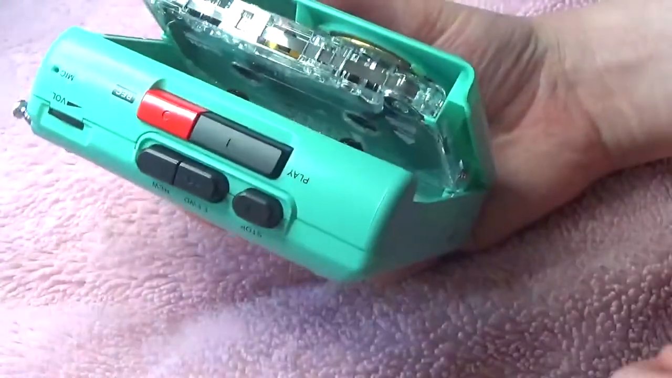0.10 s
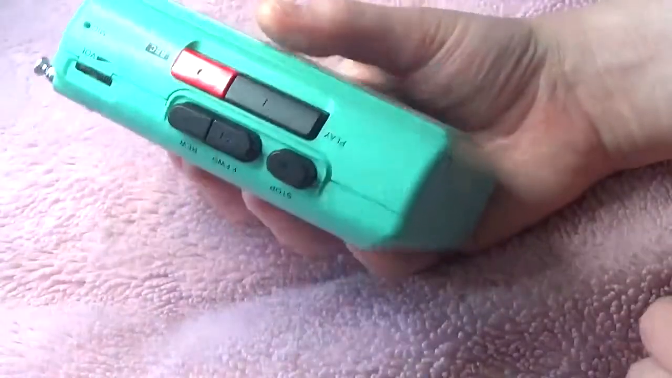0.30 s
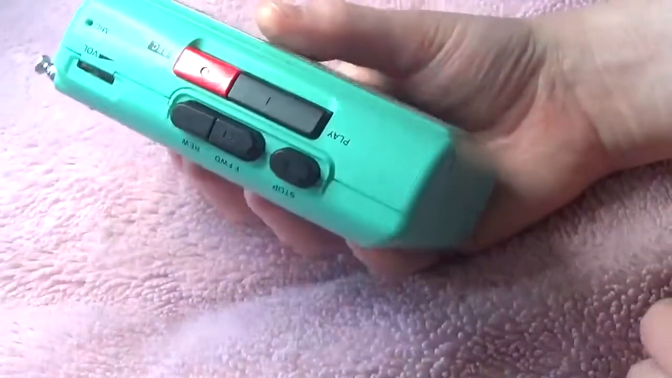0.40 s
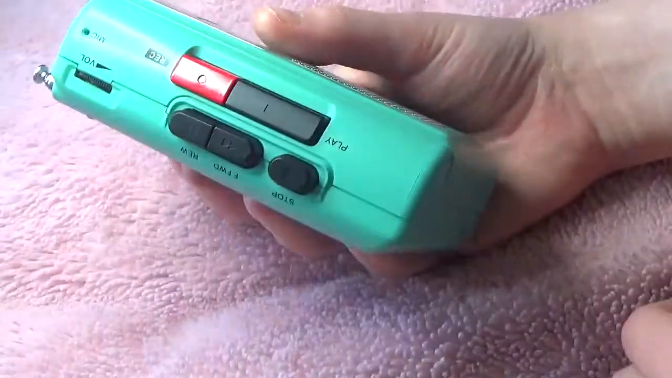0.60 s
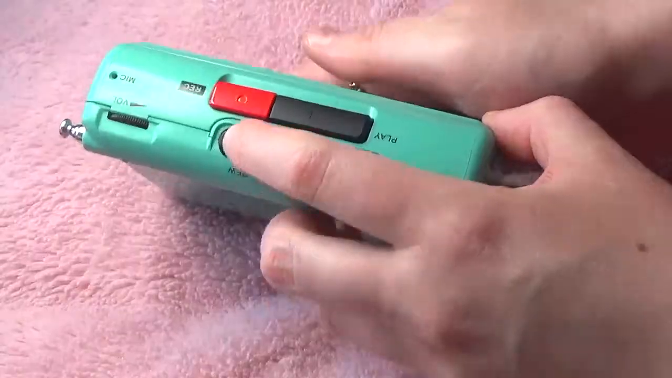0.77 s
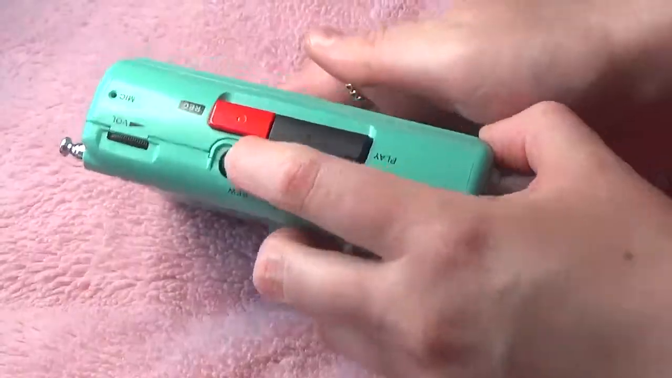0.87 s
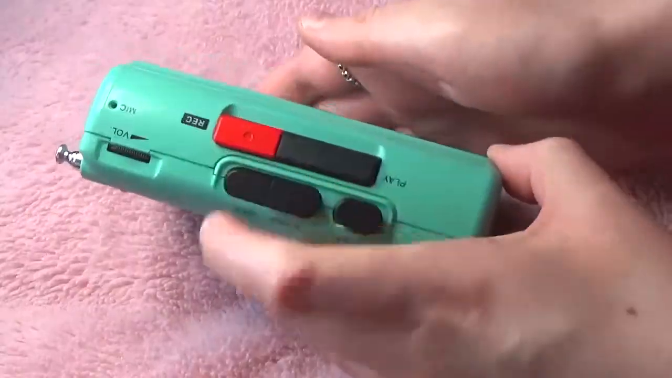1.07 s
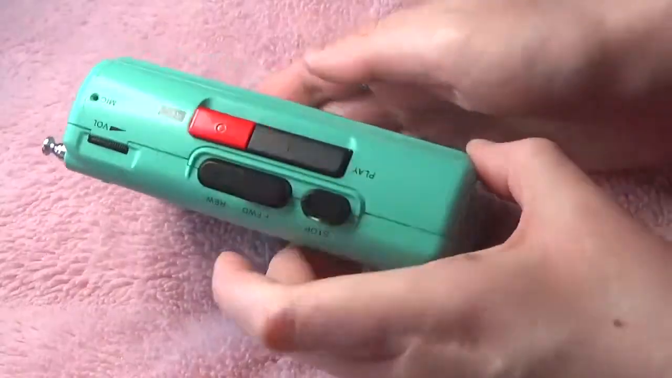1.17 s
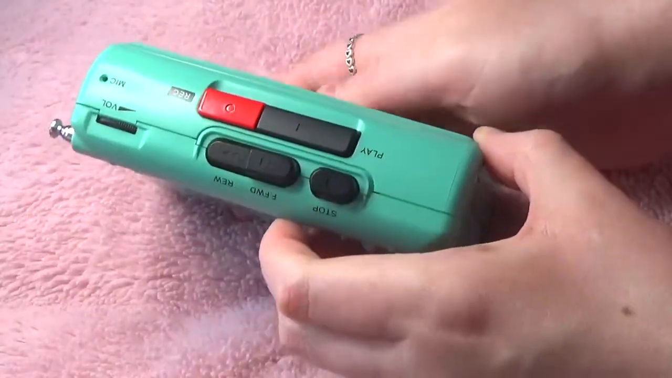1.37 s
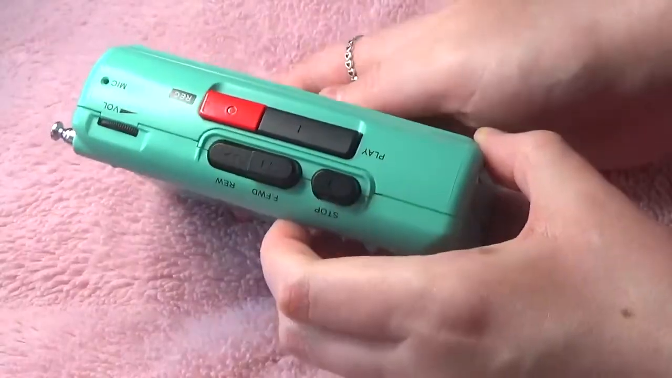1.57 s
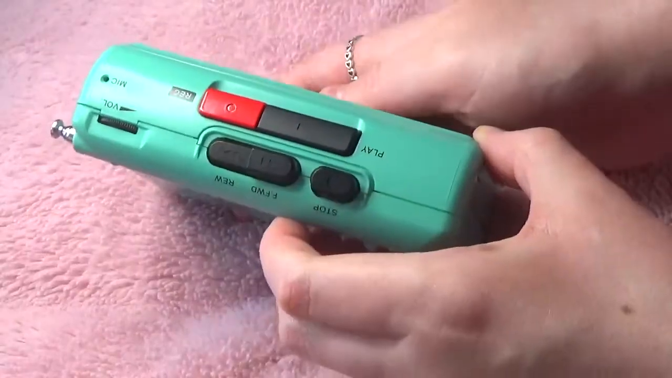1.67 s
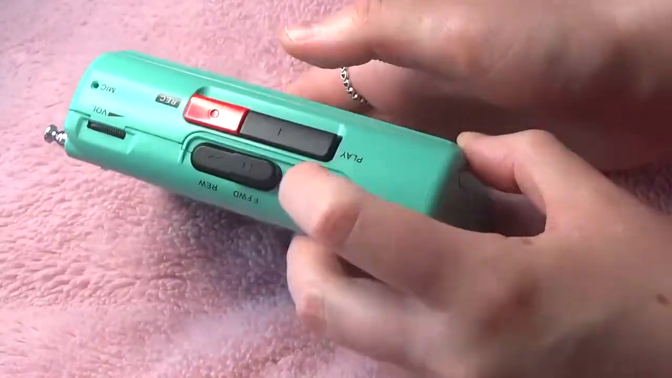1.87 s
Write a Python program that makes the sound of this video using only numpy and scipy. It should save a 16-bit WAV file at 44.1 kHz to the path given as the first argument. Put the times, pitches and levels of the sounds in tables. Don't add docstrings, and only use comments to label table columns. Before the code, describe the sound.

A small plastic cassette player door clatters shut, then keys click and a tape motor whirrs faintly

```python
import sys
import numpy as np
from scipy import signal
from scipy.fft import rfft, irfft, next_fast_len
from scipy.io import wavfile
from scipy.ndimage import map_coordinates

SR = 44100
rng = np.random.default_rng(int(sys.argv[2]) if len(sys.argv) > 2 else 0)


def voltage_ratio(level):
    return 10 ** (np.asarray(level, float) / 20)


def unload_wav(signal):
    wavfile.write(
        sys.argv[1],
        SR,
        np.round(np.clip(np.atleast_2d(signal).T, -1, 1) * 32767).astype(np.int16),
    )


N = 83790


def door():
    # (time [s], crack [dB], boom re crack [dB], panel ring re crack [dB], t60 [s])
    door_hits = [(.1620, -61, 7, 10, 0.012), (.1910, -47.5, -7, -1, 0.0055), (.2245, -37.5, 4, 7.5, 0.016),
                 (.2305, -30, 6, -8, 0.014), (.2397, -32.5, -5, -1.5, 0.0088),
                 (.2425, -18, -20, -5.5, 0.028), (.2485, -13, 0, -12, 0.012), (.2520, -12, -8, -7, 0.012),
                 (.2560, -10, -3.5, -12, 0.016), (.2615, -18.5, -0.5, 0.5, 0.0068),
                 (.2630, -25.5, 14, 10, 0.01), (.2710, -26.5, -32, -4, 0.032), (.2785, -31, 9, 6.5, 0.0083),
                 (.2828, -15, -14.5, -1.5, 0.024), (.2862, -9, -15, -14.5, 0.014),
                 (.2935, -20.5, -0.5, -19, 0.023)]
    # (frequency [Hz], level [dB])
    door_body = [
        [(672, 320, -18), (914, 180, -4), (1083, 130, -1.5), (1590, 200, -19)],
        [(2320, 940, -0.5), (2930, 150, 3.5), (3226, 270, -0.5), (4100, 460, -8)],
        [(4000, -18.5), (4800, -10.5), (5800, -6), (7500, -6), (9000, -3), (10000, -1.5), (11000, -6.5)],
    ]
    # (time [s], peak level [dB], frequency [Hz], t60 [s])
    door_rings = [(.2250, -23.5, 1080, 0.021), (.2395, -24.5, 2980, 0.02), (.2480, -14, 1150, 0.047),
                  (.2490, -31, 368, .04), (.2620, -12.5, 887, 0.021), (.2620, -16.5, 3200, .015),
                  (.2630, -12.5, 1170, 0.018), (.2620, -20.5, 1547, 0.021), (.2525, -20, 5700, .012),
                  (.2530, -14, 10200, .012), (.2565, -23, 9950, .012), (.2610, -20, 9820, .015),
                  (.2310, -31, 1050, 0.018), (.2790, -15, 1120, 0.017), (.2835, -23.5, 266, 0.023),
                  (.2850, -20, 711, 0.031), (.2850, -27, 135, .05), (.2860, -29, 490, .06),
                  (.2625, -21, 2400, .015), (.2790, -25, 2200, .012), (.2970, -31.5, 243, 0.031)]
    return contacts(door_hits, door_body) + rings(door_rings)


def keys():
    # (time [s], crack [dB], boom re crack
    # [dB], panel ring re crack [dB], t60 [s])
    key_hits = [(.6740, -46, -3, 1, 0.012), (.6755, -30.5, -7.5, -3, 0.0079), (.6800, -43, 3, -2.5, 0.01),
                (.7030, -54, 2, 6, .01), (.7098, -52, 15, 0, 0.039), (.7170, -58, -9, -6, 0.03),
                (.7240, -55, 10, 3, 0.015), (.7360, -62, 3, 10, .012), (.7410, -48.5, -3, 8, 0.012),
                (.7440, -32, -2, -10.5, 0.0074), (.7730, -54, -5, 0, 0.04), (.7820, -33, 2, 2.5, 0.021),
                (.7860, -10.5, -15.5, -7.5, 0.011), (.7995, -34, -4, 1, 0.012), (.8040, -42, 0, -1, 0.01),
                (.8225, -41, 2, -4, 0.015), (.8270, -40, -5, -11, .01), (.8380, -36, -2, -10, 0.0134),
                (.8412, -21, -25, -14, 0.0088), (.8450, -33, -15, -4, 0.0086), (.9620, -39, -7, -5, 0.0123),
                (.9650, -35, 0, 3.5, 0.013), (.9690, -45.5, 9.5, -2, 0.01), (.9935, -57, -3, 10, 0.01),
                (1.809, -53.5, -11, 3, .008)]
    # (frequency [Hz], level [dB])
    key_body = [
        [(640, 90, -15), (770, 240, -2), (1110, 89, 2.5), (1505, 120, -4), (2050, 220, -8)],
        [(2230, 540, -7), (2920, 470, -3), (3620, 390, -2), (4070, 210, -2), (4560, 530, -7)],
        [(4000, -17), (5200, -7.5), (6300, -1.5), (7500, -4.5), (9000, -2), (10200, -2.5), (11000, -1.5)],
    ]
    # (time [s], peak level [dB], frequency [Hz], t60
    # [s])
    key_rings = [(.6760, -35, 3950, .01), (.6765, -37, 2700, .01), (.6760, -31.5, 10500, 0.012),
                 (.6790, -45, 1390, 0.028), (.7030, -51, 3800, .012), (.7445, -46, 980, 0.059),
                 (.7820, -26, 3800, 0.0075), (.7865, -18.5, 1090, 0.028), (.7865, -22.5, 760, 0.03),
                 (.7870, -31, 1510, 0.033), (.7885, -26, 6140, .01), (.7890, -25, 8800, .008),
                 (.7870, -34.5, 2010, .02), (.7110, -44, 900, .012), (.8120, -33, 1050, 0.018),
                 (.8225, -35, 2440, 0.023), (.8415, -33.5, 2990, .012), (.8460, -37, 3660, 0.018),
                 (.9625, -36, 4630, 0.016), (.9650, -35, 2290, 0.023), (.9650, -38, 2860, .012),
                 (.9660, -39.5, 3920, .015), (.9650, -35.5, 1492, 0.021), (.9660, -36, 1930, .025),
                 (.9670, -42, 630, 0.026), (.9655, -40, 1100, .02), (1.8095, -46, 3550, .015),
                 (1.8095, -52, 6900, .008), (.8420, -26, 8200, .007)]
    # (time [s], level [dB])
    rattle = [
        (.79, -39),
        (.81, -45),
        (.83, -48),
        (.85, -46.5),
        (.87, -65),
        (.89, -80),
    ]
    grains = []
    for db in (-3, -12, -6):
        uneven = voltage_ratio(db + 4.1 * wobble(300))
        grains.append(curve(rattle) * uneven * rng.standard_normal(N))
    return contacts(key_hits, key_body) + rings(key_rings) + plastic(grains, key_body)


def contacts(rows, body):
    crack = bursts([(s, db, t60) for s, db, low, mid, t60 in rows])
    panel = bursts([(s, db + mid, 0.97 * t60) for s, db, low, mid, t60 in rows])
    push, t = np.zeros(N + 99), np.arange(24) / 24
    for s, db, low, mid, t60 in rows:
        start = round((s + .0008) * SR)
        push[start:][:len(t)] += voltage_ratio(db + low - 9.0) * np.sin(np.pi * t)
    return plastic([crack, push[:N], panel], body)


def plastic(forces, body):
    boom, panel, crack = body
    bright = filtered(forces[0], lambda hz: 2.08 * voltage_ratio(along(crack, hz)))
    hollow = filtered(resonant(forces[1], boom), lambda hz: (1j * hz / (600 + 1j * hz)) ** 2)
    return bright + hollow + resonant(forces[2], panel)


def bursts(rows, attack=0.11):
    out, t = np.zeros(N + SR), np.arange(SR // 20) / SR
    for s, db, t60 in rows:
        rise_s = attack * max(t60, .002)
        shape = voltage_ratio(-60 * t / max(t60, .002)) * (1 - np.exp(-t / rise_s)) ** 2
        burst = shape * rng.standard_normal(len(t))
        burst = burst * np.linalg.norm(shape) / np.linalg.norm(burst) / shape.max()
        out[round(s * SR):][:len(t)] += voltage_ratio(db - 6.5) * burst
    return out[:N]


def rings(rows, cycles=1.31):
    out, t = np.zeros(N + SR), np.arange(SR // 10) / SR
    for s, db, hz, t60 in rows:
        envelope = voltage_ratio(db - 60 * t / t60) * (1 - np.exp(-t * hz / cycles))
        out[round(s * SR):][:len(t)] += envelope * np.sin(2 * np.pi * hz * t)
    return out[:N]


def motor():
    # (time [s], level [dB])
    run_up = [
        (.79, -90),
        (.82, -69),
        (.95, -63),
        (1.05, -62),
        (1.3, -61.5),
        (1.6, -61),
        (1.9, -60.5),
    ]
    # (frequency [Hz], width [Hz], level [dB])
    case_modes = [(760, 244, -2), (1047, 204, -3), (1464, 250, -11), (2137, 200, 0), (2740, 460, -7.5),
                  (3574, 313, -1.5), (6800, 4200, -13.5), (8940, 1200, -9), (10220, 230, -9)]
    # (time [s], peak level [dB])
    reel_ticks = [(1.083, -44), (1.1692, -44), (1.1913, -40.5), (1.2344, -43), (1.384, -35.5),
                  (1.492, -37.5), (1.514, -43), (1.598, -37), (1.6735, -47), (1.809, -39), (1.8667, -47)]
    gear_per_s, gear_spread_db, flutter_db = 280, 1, 2.5
    bearing_db = -10
    whirr = 0
    for hz, width, db in case_modes:
        teeth_db = gear_spread_db * wobble(gear_per_s)
        slow_db = flutter_db * np.tanh(3000 / hz) * wobble(80)
        teeth = voltage_ratio(teeth_db + slow_db) * rng.standard_normal(N)
        mode = [(hz, 1.5 * width, 0)]
        tone = unit(resonant(resonant(teeth, mode), mode))
        whirr = whirr + voltage_ratio(db - 1) * np.sqrt(width / 400) * tone
    ticks = bursts([(s - .001, db - 7.0, .03) for s, db in reel_ticks])
    ring = resonant(resonant(ticks, [(3640, 340, 0)]), [(3560, 380, 0)])
    shell = resonant(ticks, [(2460, 300, -7), (6550, 760, -3)])
    bearing = unit(resonant(rng.standard_normal(N), [(8500, 10600, 0)]))
    whirr = whirr + voltage_ratio(bearing_db) * bearing
    return curve(run_up) * whirr + voltage_ratio(-16.0) * ring + voltage_ratio(-17) * shell


def near(x):
    spread_db = -12
    side = voltage_ratio(spread_db) * filtered(x, lambda hz: 1j * np.cos(hz / 260 + 0.67) + 0.29 * np.sin(hz / 170))
    return np.array([x + side, x - side])


def room(x):
    # (frequency [Hz], level [dB])
    walls = [(300, -1), (600, 1.5), (1100, -6), (1600, 4), (2500, -1.5), (3300, -2.5), (4500, 0),
             (11000, 2)]
    # (frequency [Hz], t60 [s])
    decay = [(200, 0.29), (600, 0.21), (1100, 0.15), (2000, 0.18), (11000, 0.12)]
    hz, t, z = signal.stft(rng.standard_normal((2, SR // 3)), SR, nperseg=128)
    fade_db = along(walls, hz)[:, None] - 60 * t / along(decay, hz)[:, None]
    tail = signal.istft(z * voltage_ratio(fade_db), SR, nperseg=128)[1]
    tail = tail[0] + voltage_ratio(-7.5) * tail[1] * [[1], [-1]]
    tail = tail / np.linalg.norm(tail[0])
    late = np.pad(x, (150, 0))[None]
    return signal.fftconvolve(late, tail, axes=1)[:, :N]


def bird():
    # (time [s], pitch [Hz], level [dB])
    song = [
        (0, 3100, -65),
        (.1, 3110, -65),
        (.2, 3090, -67),
        (.4, 3320, -68),
        (.47, 3390, -60),
        (.55, 3410, -60),
        (.61, 3435, -65),
    ]
    trill_s, trill_per_s, note_s = -.004, 29.95, .014
    out, t = np.zeros(N + SR), np.arange(round(note_s * SR)) / SR
    times, pitch, level = np.transpose(song)
    for s in trill_s + np.arange(19) / trill_per_s:
        hz = np.interp(s, times, pitch) * rng.normal(1, 0.0019)
        note = np.sin(np.pi * t / note_s) ** 2 * np.sin(2 * np.pi * hz * t)
        db = np.interp(s, times, level) + rng.normal()
        out[max(round(s * SR), 0):][:len(t)] += voltage_ratio(db) * note
    return out[:N] * voltage_ratio([[-1.5], [1.5]])


def floor():
    # (frequency [Hz], level per Hz [dB])
    hiss = [(100, -30), (150, -8), (950, -9.5), (1700, -15), (2900, -19), (4000, -20.5), (11000, -24)]
    # (frequency [Hz], level per Hz [dB])
    rumble = [(8, -53), (15, 8.5), (21, 10), (29, -24), (50, -14), (115, -11), (170, -15.5), (250, -38.5)]
    # (time [s], half length [s], level [dB],
    # frequency [Hz])
    shifts = [
        (1.44, .025, -52, 90),
        (1.47, .03, -59, 60),
        (1.5, .012, -55, 70),
        (1.525, .015, -56, 95),
        (1.26, .04, -64, 105),
        (.06, .13, -57, 21),
        (.03, .05, -62, 70),
    ]
    hiss_db, rumble_db = -63.5, -58
    t = np.arange(N) / SR
    bumps = 0
    for s, half, db, hz in shifts:
        swell = voltage_ratio(db + 2.5 * wobble(40)) * np.exp(-((t - s) / half) ** 2)
        bumps = bumps + swell * np.sin(2 * np.pi * hz * (t - s))
    return voltage_ratio(hiss_db) * pair(hiss) + voltage_ratio(rumble_db + 1.64 * wobble(2.1)) * pair(rumble) + bumps


def pair(spectrum):
    # (frequency [Hz], correlation [0-1])
    alike = [(30, 1), (60, 0.93), (130, 0.97), (270, 0.67), (1200, 0.06), (2600, 0.38), (6000, 0.55),
             (11000, 0.89)]

    def mid_side(hz):
        turn = np.arccos(np.clip(along(alike, hz), -1, 1)) / 2
        return voltage_ratio(along(spectrum, hz)) * [np.cos(turn), np.sin(turn)]

    mid, side = filtered(rng.standard_normal((2, N)), mid_side)
    return unit(np.array([mid + side, mid - side]))


def resonant(x, peaks):
    def shape(f):
        total = 0
        for k, (centre, width, db) in enumerate(peaks):
            damping = 1j * f * width
            total = total + (-1) ** k * voltage_ratio(db) * damping / (centre * centre - f * f + damping)
        return total

    return filtered(x, lambda f: shape(f) / np.sqrt(np.mean(abs(shape(f)) ** 2)))


def filtered(x, response):
    m = next_fast_len(N + SR // 2)
    return irfft(rfft(x, m) * response(np.fft.rfftfreq(m, 1 / SR)), m)[..., :N]


def along(points, hz):
    f, v = np.transpose(points)
    return np.interp(np.log(hz + 1), np.log(f + 1), v)


def curve(rows):
    s, db = np.transpose(rows)
    return voltage_ratio(np.interp(np.arange(N) / SR, s, db, left=-120, right=-120))


def wobble(rate):
    knots = rng.standard_normal(int(N * rate / SR) + 4)
    return map_coordinates(knots, [np.arange(N) * rate / SR])


def unit(x):
    return x / np.sqrt(np.mean(x ** 2) + 1e-20)


def scene():
    door_room_db, key_room_db = -7, -13
    shut = door()
    press = keys() + motor()
    direct = near(shut + press)
    echo = voltage_ratio(door_room_db) * room(shut) + voltage_ratio(key_room_db) * room(press)
    return direct + echo + bird() + floor()


def top_cut(x):
    return signal.sosfilt(signal.butter(12, 12240, fs=SR, output="sos"), x)


def record(dry):
    # (frequency [Hz], level [dB])
    band_limit = [(10950, 1.5), (11100, -9.5), (11250, -36), (12300, -38), (16000, -85)]
    mix = filtered(dry, lambda hz: voltage_ratio(along(band_limit, hz)))
    return top_cut(mix)


dry = scene()
out = record(dry)
unload_wav(out)
```